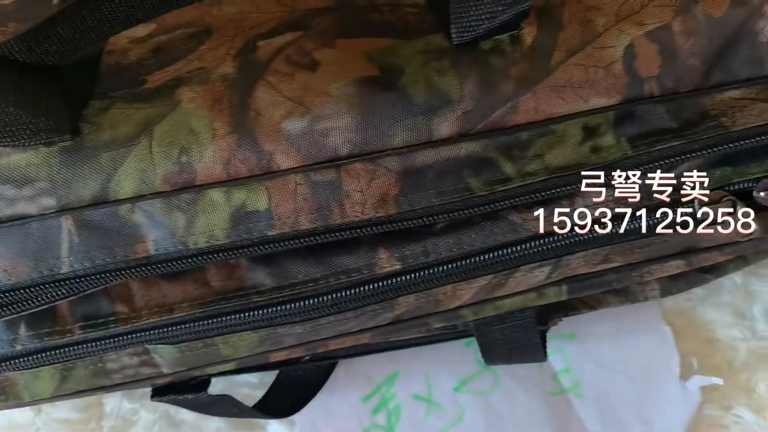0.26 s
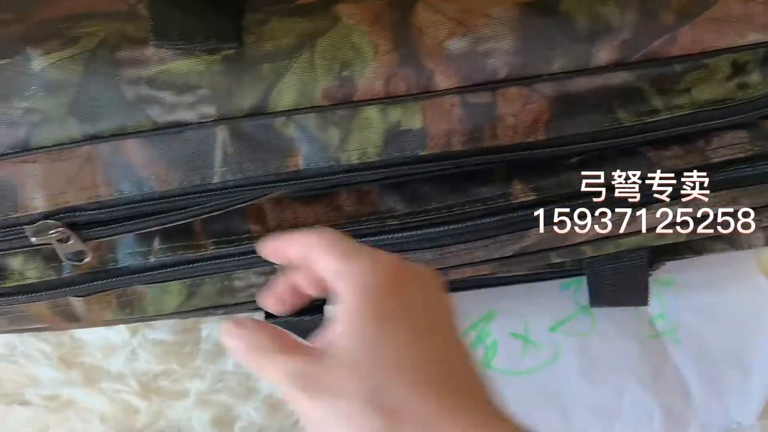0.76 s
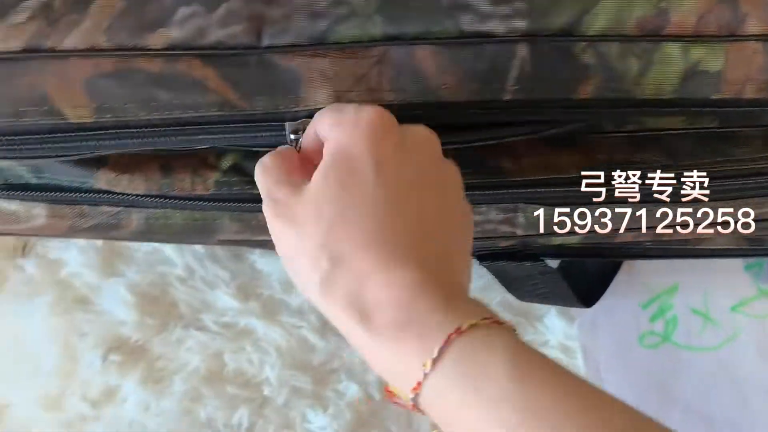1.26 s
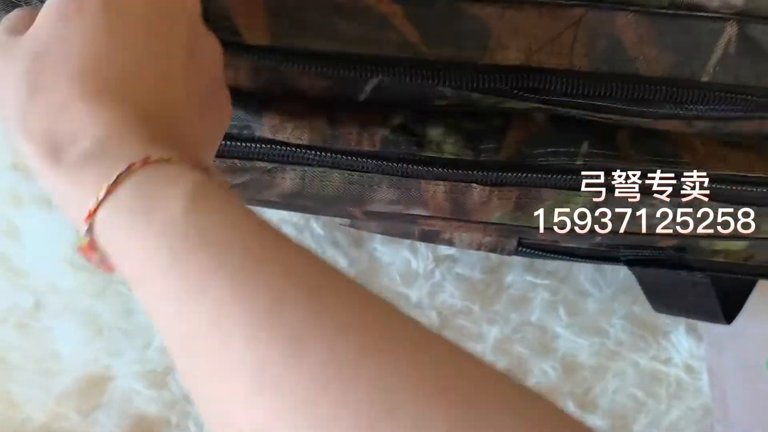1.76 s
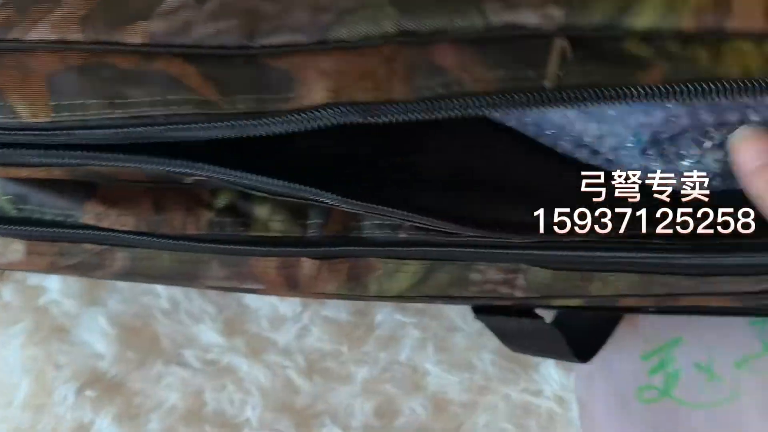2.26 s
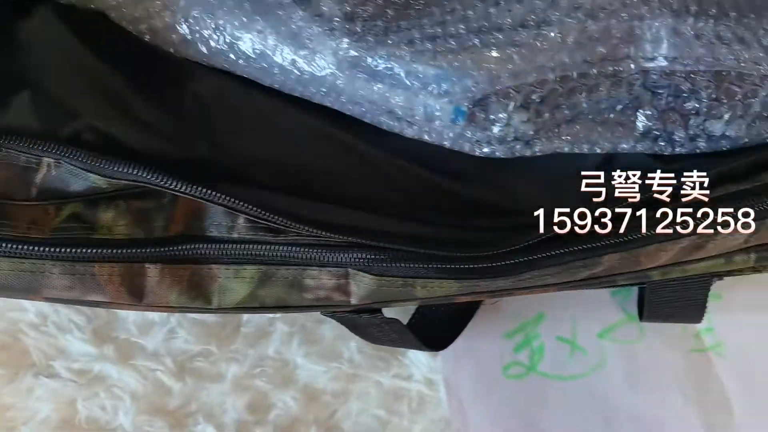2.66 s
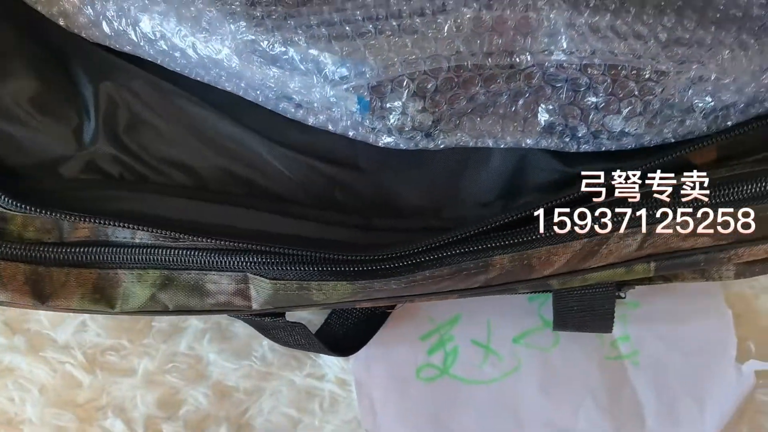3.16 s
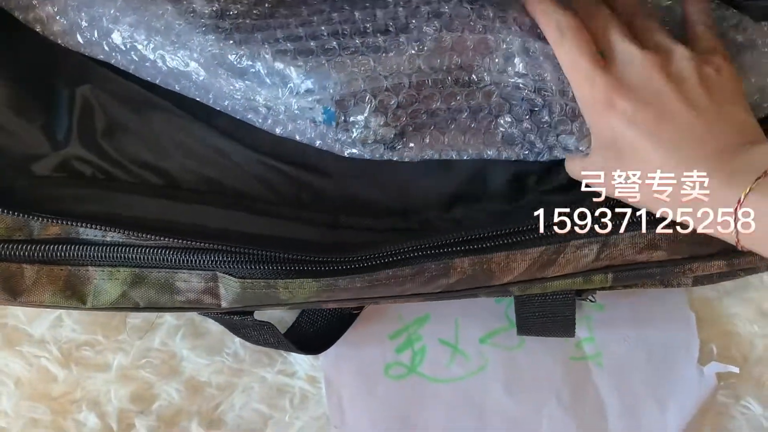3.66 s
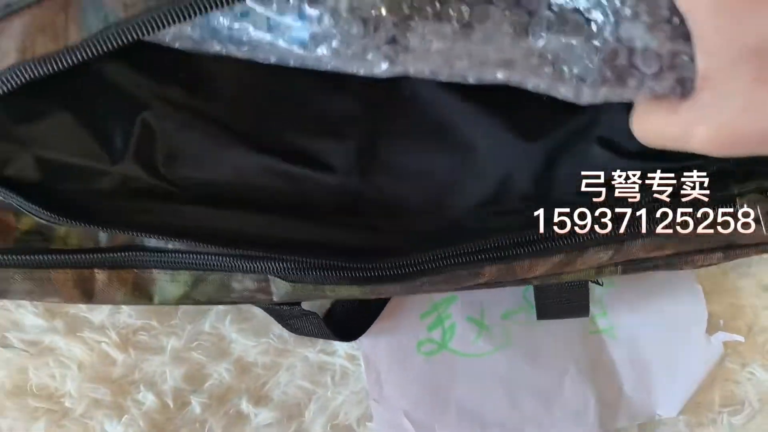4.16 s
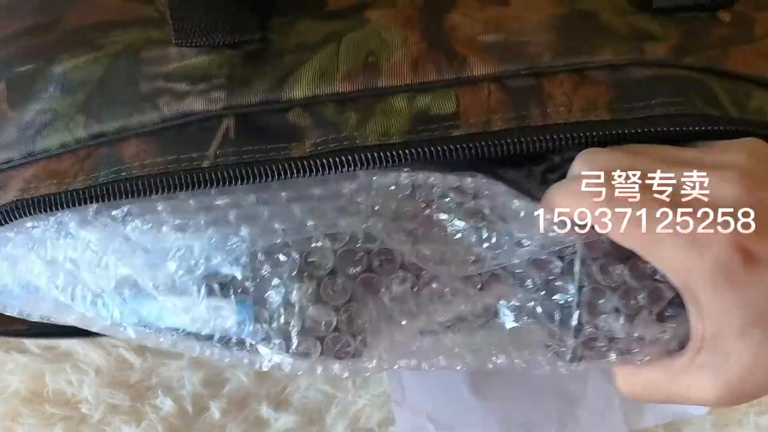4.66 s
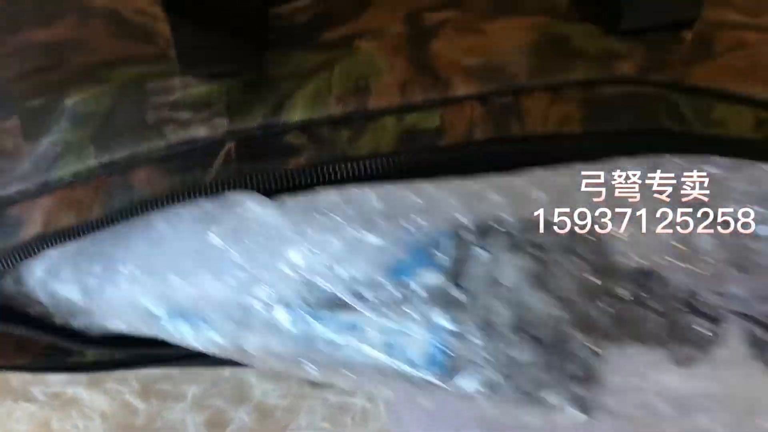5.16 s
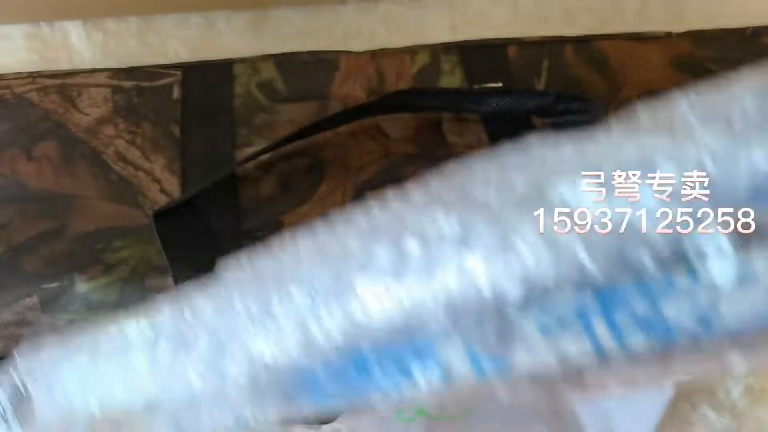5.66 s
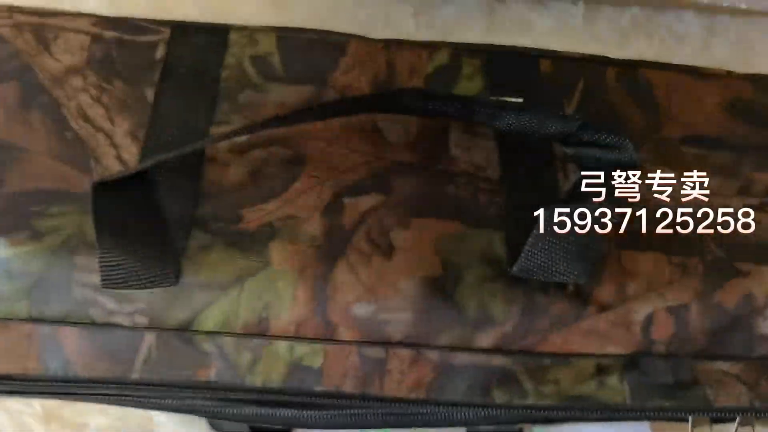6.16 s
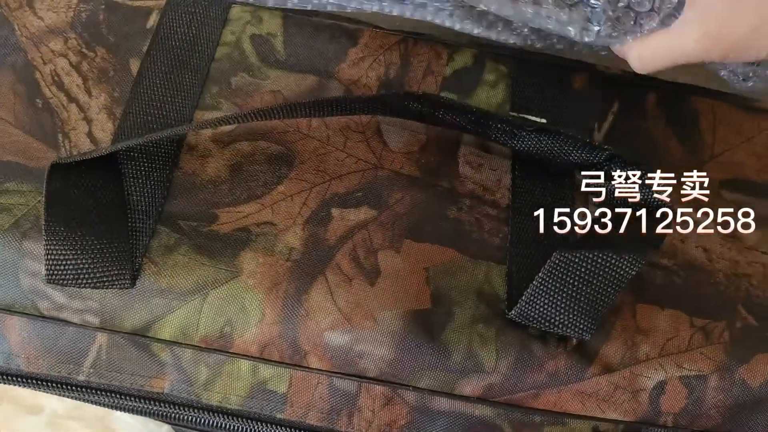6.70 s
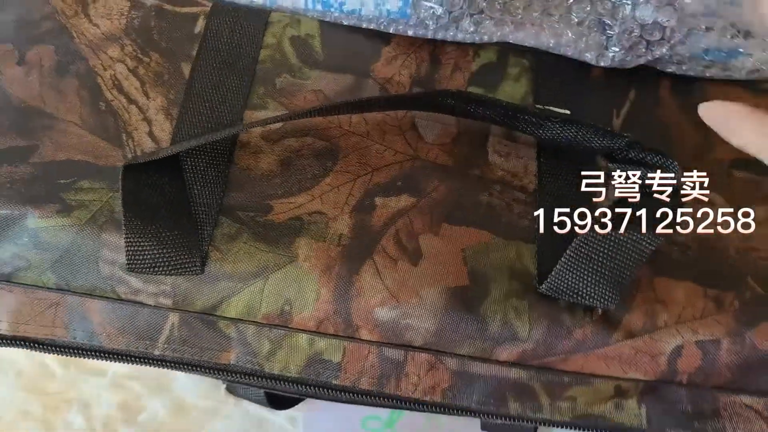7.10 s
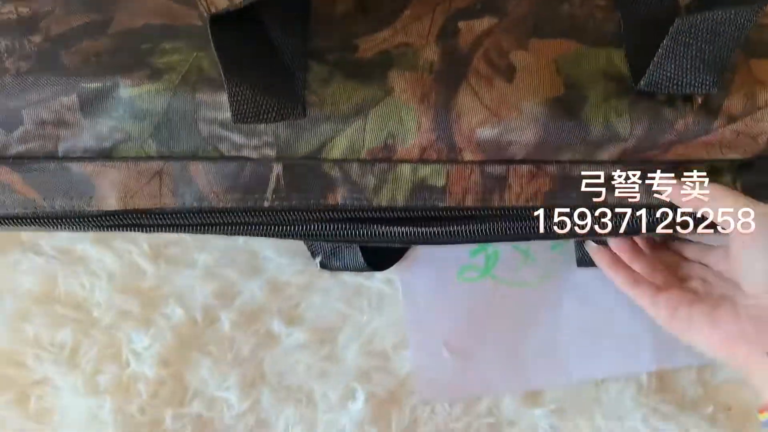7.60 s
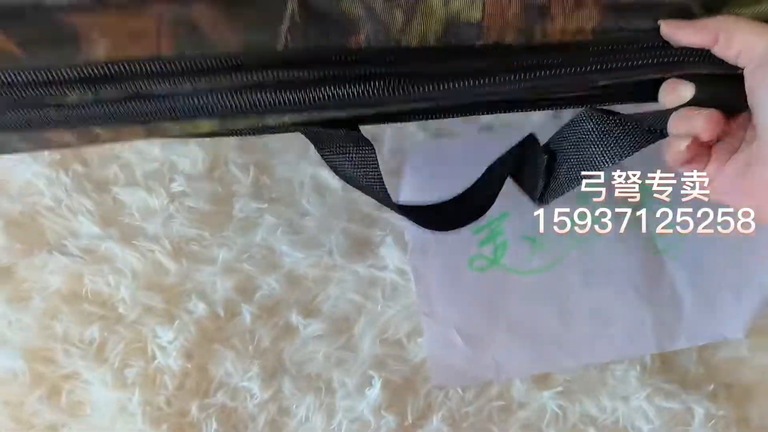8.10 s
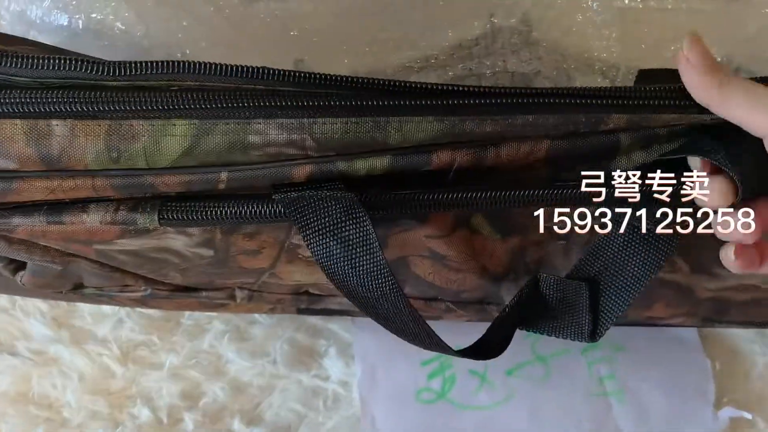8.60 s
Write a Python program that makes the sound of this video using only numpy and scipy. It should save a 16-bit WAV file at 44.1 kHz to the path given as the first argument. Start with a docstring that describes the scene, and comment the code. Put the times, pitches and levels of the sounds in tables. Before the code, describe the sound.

A padded fabric case is unzipped in three uneven pulls, a bubble-wrapped load crackles out, thumps down heavily, then the cloth lid flops open.

```python
"""In a small furnished room, a padded fabric case is unzipped close by in three uneven pulls of meshing teeth.
A heavy item in bubble wrap is dragged out, crinkling by stick-slip, and set down behind the case with two thumps.
Then a hand rubs along the cloth and throws the lid open, which lands with a soft low flop.
Friction is shaped noise and creases popping; knocks and landings are damped oscillations; a faint room tail follows."""
import sys
import numpy as np
from scipy import signal
from scipy.fft import rfft, irfft
from scipy.io import wavfile
from scipy.ndimage import uniform_filter1d, map_coordinates

SR = 44100
rng = np.random.default_rng(int(sys.argv[2]) if len(sys.argv) > 2 else 0)


def int16_out(signal):
    """Quantize to a 16-bit WAV file."""
    q = np.round(np.clip(np.atleast_2d(signal).T, -1, 1) * 32767)
    wavfile.write(sys.argv[1], SR, q.astype(np.int16))


N = 389844
TIME = np.arange(N) / SR  # s

# speed of the slider, one curve for each pull: t/s, tooth rate/(teeth per s)
ZIP_SPEED = [
    [(0, 386), (.03, 352), (.105, 313), (.135, 182), (.17, 210)],
    [(.195, 117), (.23, 143), (.27, 158), (.33, 94)],
    [(1.32, 65.7), (1.47, 110), (1.5, 156), (1.55, 170), (1.575, 212), (1.6, 226), (1.622, 280),
     (1.648, 300), (1.68, 284), (1.7, 246), (1.73, 195), (1.79, 190)],
]
# each pull at the usual speed: buzz of the cloth panel level/dB, rasp of the teeth level/dB,
# unevenness as a share of the speed (capped below), easing off at the end t/s
ZIP_PULLS = [(-40.5, -48.5, 0.21, 0.029), (-43, -46, 0.09, 0.033), (-35.5, -42.5, .04, 0.097)]
# response of the tugged cloth panel: f/Hz, level/dB
ZIP_PANEL_SPECTRUM = [(60, -38), (130, 5.5), (300, 19.5), (400, 14.5), (530, 18.5), (720, -1.5), (920, 12),
                      (1150, -25), (1650, 10), (2500, -48), (5000, -43)]
# spectrum of the teeth: f/Hz, level/dB per Hz
ZIP_TEETH_SPECTRUM = [(600, 0.5), (1200, 4.5), (2000, -1), (3200, -1), (4500, -9), (6500, -4.5), (7800, 0),
                      (9000, -4), (10500, -4.5), (12800, -15), (15000, -14), (16000, 1.5)]
USUAL_TEETH_PER_S = 200
BUZZ_DB_PER_DOUBLING, RASP_DB_PER_DOUBLING = 9.5, 15  # a faster pull is louder
STEADYING, MAX_UNEVENNESS = 1.6, .17  # unevenness falls with this power of the speed, and is capped
GRIP_S = 0.00046  # the slider starts at once
OPPOSITE_ROW, TOOTH_TICK_S = .3, .0009  # strength of the opposite row of teeth; decay time of one tick


def zipper(uneven_db=14):
    """Periodic excitation: each parting tooth tugs the panel and ticks; slow pulls are soft and uneven."""
    out, t = np.zeros((2, N)), TIME[:2 * SR]
    for speed, (buzz_db, rasp_db, unevenness, ease_s) in zip(ZIP_SPEED, ZIP_PULLS):
        times, teeth_per_s = np.transpose(speed)
        rate = np.interp(t, times, teeth_per_s)
        pace = rate / USUAL_TEETH_PER_S
        uneven = np.minimum(unevenness / pace ** STEADYING, MAX_UNEVENNESS)
        moving = ramp((t - times[0]) / GRIP_S) * ramp((times[-1] - t) / ease_s)

        # the whole part of the running phase counts the teeth
        phase = np.cumsum(rate * (1 + uneven * wander(120)[:len(t)])) / SR
        tooth = phase.astype(int)
        tooth_db = uneven_db * np.sqrt(abs(uneven)) / 2 * rng.standard_normal(len(t))[tooth]
        size = amp(tooth_db)
        tugs = np.diff(tooth, prepend=0) * size

        # ticks stand apart in a slow pull and merge in a fast one; the opposite row lets go half a step later
        tick_phase = TOOTH_TICK_S * rate
        near_row = np.exp(-(phase % 1) / tick_phase)
        far_row = OPPOSITE_ROW * np.exp(-((phase + .5) % 1) / tick_phase)
        gate = size * (near_row + far_row) + .1  # .1: the steady drag of the slider

        pull = (tugs - uniform_filter1d(tugs, size=600)) * np.sqrt(SR / rate) * np.array([[1], [.5]])
        rough = .04 + 4 * abs(uneven)  # a steady pull buzzes cleanly, a jerky one scrapes
        scraping = rough * evened(gate) * rng.standard_normal((2, len(t)))
        panel = colour(pull + scraping, ZIP_PANEL_SPECTRUM)
        teeth = colour(gate * rng.standard_normal((2, len(t))), ZIP_TEETH_SPECTRUM)

        # as the hand eases off, the rasp dies before the buzz
        buzz = moving * amp(buzz_db + BUZZ_DB_PER_DOUBLING * np.log2(pace))
        rasp = moving ** 2 * amp(rasp_db + RASP_DB_PER_DOUBLING * np.log2(pace))
        for part, gain in ((panel, buzz), (teeth, rasp)):
            local_power = abs(uniform_filter1d(part[0] ** 2, size=2400))
            out[:, :len(t)] += gain * part / np.sqrt(local_power + 1e-12)
    return out


# touches of the pull tab and the teeth: t/s, peak level/dB before the common gain,
# lowest f/Hz (a light touch rings only the high modes)
TICKS = [(0.186, -47, 5000), (0.232, -36, 5000), (0.264, -41.5, 4000), (0.297, -44.5, 3000),
         (1.055, -50, 2970), (1.077, -27.5, 604), (1.119, -41, 3000), (1.141, -48, 1000), (1.202, -45, 700),
         (1.318, -37.5, 600), (1.358, -42, 2000), (1.39, -36, 4000), (1.401, -37, 4000), (1.413, -40, 4000),
         (1.446, -35.5, 5000), (1.459, -43, 6000), (1.471, -28, 800), (1.479, -31, 3040),
         (1.526, -30.5, 4000), (1.847, -21.5, 500), (3.02, -42, 6000)]
# modes of pull tab and slider: f/Hz, width/Hz, level/dB
TAB_MODES = [(950, 155, 20), (3500, 340, -1), (5000, 400, 1), (7400, 400, 6), (8400, 350, 7)]


def ticks(ring_db=-4, gain_db=1):
    """Modal excitation by impact: metal meets metal in a dry crack with a heavily damped ring."""
    out, t = np.zeros((2, N)), TIME[:SR // 16]
    for s, db, low_hz in TICKS:
        crack = rng.standard_normal((2, len(t))) * np.exp(-t / .0011)
        ring = sum(amp(level) * resonate(crack, hz, hz / width) for hz, width, level in TAB_MODES)
        direct = .2 * band(crack, 9000, "low", order=4)
        sound = band(amp(ring_db) * ring + direct, low_hz, "high")
        add(out, s, amp(db + gain_db) * sound / abs(sound[0]).max())
    return out


# tugs and slides of the bubble wrap: start t/s, attack t/s, hold t/s, release t/s,
# rub level/dB before the common gain, crispness level/dB above the rub, rumple of the panel level/dB
WRAP_RUB = [(2.75, 0.14, 0.035, 0.088, -44.5, 2.5, -47), (3.53, 0.058, 0.063, 0.3, -47.5, 1, -52),
            (3.7, 0.046, 0.19, 0.12, -46, 4.5, -55), (3.92, 0.096, 0.15, 0.44, -42.5, -1, -41.5),
            (4.3, 0.071, 0.067, 0.26, -44.5, 1.5, -43), (4.48, 0.17, 0.59, 0.23, -53.5, 1, -56.5),
            (4.945, 0.037, 0.034, 0.075, -39.5, -1.5, -38.5), (5.05, 0.17, 0.051, 0.21, -55.5, 2, -57),
            (5.27, 0.069, 0.07, 0.065, -56.5, 1.5, -53), (5.44, 0.039, 0.037, 0.48, -72, 5, -67.5),
            (5.85, 0.22, 0.33, 0.23, -79, 2, -69), (6.255, 0.023, 0.015, 0.47, -61.5, 4, -60),
            (6.45, 0.12, 0.26, 0.32, -52, -0.5, -54), (6.67, 0.1, 0.015, 0.1, -48.5, 1, -64),
            (6.87, 0.028, 0.025, 0.22, -51.5, 1.5, -66), (7.12, 0.044, 0.028, 0.49, -95, -2, -70.5),
            (8.34, 0.06, 0.03, 0.067, -41.5, -2.5, -60)]
# spectrum of the film: f/Hz, level/dB per Hz
WRAP_SPECTRUM = [(240, -28.5), (400, 0.5), (690, 0), (900, 5.5), (1310, 2.5), (1960, 1), (3160, -4.5),
                 (4580, -9.5), (6500, -10), (8240, -7.5), (10500, -13), (15000, -17)]


def wrap(clump_db=1.15, drift_db=1.5, gain_db=1):
    """Stick-slip friction: film slides with a fine, dense crinkle; now and then a single crease pops out."""
    dull, crisp, _ = strokes(WRAP_RUB)
    sliding = grains(per_s=4000, spread_db=3, ring_s=.0005, smooth=.8, count=8)
    popping = .4 * crackle(per_s=300, spread_db=3.5, cycles=1.5)
    texture = drift(colour(sliding + popping, WRAP_SPECTRUM), drift_db)
    texture = texture * amp(clump_db * wander(45))
    return amp(gain_db) * rub(texture, dull, crisp)


# snaps of the plastic film and the stiff cloth: t/s, peak level/dB, f/Hz, decay t/s
SNAPS = [(2.758, -37, 1300, .003), (2.907, -25, 2500, .0014), (2.967, -29, 1900, .0016),
         (3.678, -21, 2400, .0007), (3.752, -25, 6000, .0012), (3.7934, -9, 6200, .001),
         (3.795, -14, 1760, .0009), (3.839, -22, 5500, .0006), (3.993, -21, 7100, .001),
         (4.094, -23, 8000, .0007), (4.129, -16, 3000, .0015), (4.226, -28, 2500, .0008),
         (4.264, -26, 1200, .0027), (4.274, -30, 900, .003), (4.571, -33, 3060, .0017),
         (4.614, -34, 5500, .0008), (4.658, -35, 3500, .001), (4.7446, -29, 3150, .0014),
         (4.857, -33, 1770, .002), (5.4, -33, 1400, .003), (4.9438, -10, 2030, .002),
         (4.9452, -12, 4000, .0012), (4.945, -20, 800, .002), (4.13, -25, 1000, .002),
         (5.42, -36.5, 5040, .011), (5.524, -46, 7000, .002), (5.584, -37, 5000, .004),
         (5.977, -41, 7170, .0017), (6.081, -50, 2440, .003), (6.806, -23, 1755, .0083),
         (6.807, -25, 8700, .015), (6.635, -16, 6360, .0016), (6.68, -23, 5000, .002),
         (6.931, -36, 7700, .0009), (6.977, -27.5, 1850, .0013), (7.031, -39, 2300, .0013),
         (7.58, -36, 870, .0024), (7.691, -35, 1700, .004), (7.756, -35, 1600, .004),
         (7.769, -35, 1400, .003), (7.803, -38, 1200, .003), (7.869, -39, 2500, .002),
         (7.898, -24, 880, .004), (7.968, -26, 1400, .0025), (7.998, -33, 900, .003),
         (8.007, -31, 900, .0035), (8.386, -23, 2280, .004)]


def snaps(q=1.54, broad=0.035, low_hz=550, top_hz=11000, side_db=-4):
    """Impulsive release of strain: short cracks, each with the resonance of the small patch that lets go."""
    out, t = np.zeros((2, N)), TIME[:SR // 12]
    for s, db, hz, decay_s in SNAPS:
        crack = rng.standard_normal((2, len(t))) * np.exp(-t / decay_s) * amp([[0], [side_db]])
        patch = resonate(crack, hz, q) + broad * crack
        sound = band(band(patch, low_hz, "high"), top_hz, "low")
        add(out, s, amp(db) * sound / abs(sound[0]).max())
    return out


# bubble wrap relaxing after it is let go: start t/s, length t/s, level/dB at the start
SETTLING = [(5.43, 0.59, -63.5), (6.992, 0.33, -69.5)]
SETTLE_DB_PER_S = 23


def settling(low_hz=3000):
    """Relaxation: left alone, the creased film ticks on finely, sparsely and ever more faintly."""
    gain = 0
    for s, length, db in SETTLING:
        gain = gain + amp(db - SETTLE_DB_PER_S * abs(TIME - s)) * (TIME > s) * (TIME < s + length)
    film = colour(crackle(per_s=120, spread_db=3.5, cycles=1), WRAP_SPECTRUM)
    return gain * evened(band(film, low_hz, "high", order=1))


# heavy landings: t/s, boom level/dB, boom f/Hz, boom t60/s, rattle of the load level/dB (before halving),
# crush of the padding level/dB, shudder level/dB, shudder decay t/s
THUMPS = [(6.2847, -20.5, 202.6, 0.13, -40, -46.5, -36, .025),
          (6.298, -24, 124, 0.047, -37.5, -51, -35.5, .02), (6.329, -28, 110, 0.1, -54, -69, -47, 0.018),
          (6.393, -34.5, 111, 0.17, -72, -82, -69, 0.026),
          (6.7948, -2.5, 193, 0.046, -39.5, -52, -16.5, 0.029),
          (6.805, -8, 119, 0.25, -17.5, -29.5, -24, 0.042),
          (6.8312, -13.5, 122.8, 0.32, -18, -40, -29, .045), (8.434, -12.5, 63, 0.24, -31.5, -60, -40, .04),
          (8.477, -25, 100.7, 0.36, -34, -60, -34.5, .04), (8.519, -31, 99, 0.2, -37.5, -64, -34, 0.016)]
# modes the load rattles with: f/Hz, level/dB, t60/s
LOAD_MODES = [(67.4, -7.5, 0.68), (87, 8.5, 0.16), (177.3, -1.5, 0.38), (213.3, 6, 0.14),
              (248.4, -2.5, 0.27), (283, 1.5, 0.086), (314, -2, 0.074), (343.3, -2.5, 0.35),
              (410, -4, 0.08), (513, -12.5, 0.18), (628, -8.5, 0.19), (847.6, -8.5, 0.18),
              (990, -9.5, 0.11), (1355, -9.5, 0.12), (1860, -14, 0.12)]
# loose cloth and stuffing shaken by a landing: f/Hz, level/dB per Hz
SHUDDER_SPECTRUM = [(50, -29), (110, -7), (200, 2.5), (330, 1.5), (450, -6.5), (600, -26), (1200, -37),
                    (3000, -58)]


def thumps(crush_s=0.038, crush_hz=1200, shudder_rise_s=0.0024):
    """Impact response: a landing booms, rattles the load, crushes the padding and makes loose cloth shudder."""
    out, t = np.zeros((2, N)), TIME[:SR]
    for s, db, hz, t60, rattle_db, crush_db, shudder_db, shudder_s in THUMPS:
        rattle = sum(rng.choice([-1, 1]) * amp(level) * boom(t, f, decay, rise_s=0.00076)
                     for f, level, decay in LOAD_MODES)
        crush = evened(band(band(rng.standard_normal((2, SR)), crush_hz, "low"), 200, "high"))
        crush = crush * np.exp(-t / crush_s)
        shudder = evened(colour(rng.standard_normal((2, SR)), SHUDDER_SPECTRUM))
        shudder = shudder * ramp(t / shudder_rise_s) * np.exp(-t / shudder_s)
        swing = amp(db) * boom(t, hz, t60, rise_s=0.0012) + amp(rattle_db) * rattle / 2
        # a surface radiates little far below its own pitch
        add(out[0], s, band(swing, .33 * hz, "high"))
        add(out, s, amp(crush_db) * crush + amp(shudder_db) * shudder)
    return out


# fingers and slider knocking on the case: t/s, peak level/dB, f/Hz
KNOCKS = [(0.108, -21.5, 307), (0.221, -36.5, 304), (.907, -34.5, 292), (0.93, -41, 312), (1.321, -36, 480),
          (1.842, -22.5, 534), (1.846, -26, 110), (1.979, -43, 410), (2.017, -40, 415), (2.039, -42, 284),
          (2.108, -38.5, 213), (2.389, -43.5, 227), (2.664, -38, 186), (2.721, -31, 209),
          (2.759, -31.5, 147), (2.828, -35, 225), (3.41, -45, 363), (3.467, -39, 182), (4.035, -32.5, 544),
          (4.063, -30.5, 293), (4.265, -27, 484), (4.385, -29, 220), (7.582, -38, 340), (7.691, -31, 300),
          (7.763, -30, 300), (7.785, -31, 295), (7.896, -28.5, 384), (7.955, -22.5, 344), (7.961, -28, 314),
          (7.997, -31, 350), (8.008, -29, 306), (8.274, -29, 225), (8.304, -33.5, 206)]


def knocks(t60=0.047, puff=0.19, puff_s=0.0072, puff_hz=900):
    """Heavily damped oscillation: a dead knock on padding gives a few swings and a dull puff."""
    out, t = np.zeros((2, N)), TIME[:SR // 6]
    for s, db, hz in KNOCKS:
        dull_noise = evened(band(rng.standard_normal((2, len(t))), puff_hz, "low", order=3))
        sound = puff * dull_noise * np.exp(-t / puff_s)
        sound[0] += boom(t, hz, t60, rise_s=0.00097)
        add(out, s, amp(db) * sound / abs(sound[0]).max())
    return out


# strokes of hand and lining on the cloth: start t/s, attack t/s, hold t/s, release t/s,
# rub level/dB, crispness level/dB above the rub, rumple of the panel level/dB
CLOTH_RUB = [(.08, 0.039, 0.15, 0.12, -56, -12, -53), (.42, 0.011, 0.089, 0.071, -70.5, -3, -63.5),
             (.58, 0.012, 0.008, 0.11, -68, -0.5, -57.5), (.72, 0.061, 0.16, .1, -86.5, -3, -80),
             (.915, 0.015, 0.028, 0.32, -60.5, -9.5, -63), (1.04, 0.015, 0.024, 0.12, -60.5, -2, -52.5),
             (1.195, 0.005, 0.083, 0.068, -64.5, -9, -57), (1.32, 0.039, 0.14, 0.49, -53, -6, -50.5),
             (1.71, .02, 0.028, .12, -51, -12.5, -40), (1.79, 0.046, 0.055, 0.33, -54, -14, -49),
             (2, 0.01, 0.073, 0.16, -70, 12.5, -49), (2.08, 0.069, 0.0061, 0.15, -55, -1.5, -51.5),
             (2.22, 0.052, 0.052, 0.73, -62.5, 4, -56), (2.52, 0.013, 0.029, 0.62, -65, 2, -68),
             (2.63, 0.078, 0.11, 0.22, -52, -9.5, -50), (2.9, 0.029, 0.068, 0.099, -58, -6, -50.5),
             (3.02, 0.067, 0.041, 0.25, -59.5, -4.5, -58), (3.2, 0.069, 0.03, 0.21, -66, -1.5, -65.5),
             (7.2, 0.14, 0.36, 0.12, -79, -2.5, -76), (7.574, 0.015, 0.06, 0.47, -44, -9, -47),
             (7.745, 0.0078, 0.025, 0.7, -49, -28, -45), (7.885, 0.042, 0.061, 0.21, -45.5, -5, -38),
             (8.02, 0.057, 0.073, 1, -53, -2, -49.5), (8.32, 0.048, 0.13, 0.054, -43.5, -3, -40.5),
             (8.58, 0.15, 0.28, 0.16, -66, -6.5, -70)]
# spectrum of the weave: f/Hz, level/dB per Hz
CLOTH_SPECTRUM = [(240, -30), (400, 11.5), (553, 3.5), (839, 8.5), (1230, 0.5), (1310, 1.5), (1760, 0),
                  (3120, -8), (3470, -10.5), (5110, -15), (7870, -12.5), (9320, -16.5), (14800, -25),
                  (16000, -26)]


def cloth(clump_db=2, drift_db=2):
    """Stick-slip friction: a coarse nylon weave catching and slipping."""
    dull, crisp, _ = strokes(CLOTH_RUB)
    sliding = grains(per_s=2200, spread_db=-3.5, ring_s=0.0011, smooth=1.0, count=6)
    catching = .8 * crackle(per_s=1500, spread_db=4, cycles=4)
    texture = drift(colour(sliding + catching, CLOTH_SPECTRUM), drift_db)
    texture = texture * amp(clump_db * wander(25.0))
    return rub(texture, dull, crisp)


# nails and film skating over the weave: t/s, length t/s, f/Hz, level/dB
SCRAPES = [(2.079, 0.028, 900, -48), (2.124, 0.054, 880, -44.5), (2.238, .045, 397, -57),
           (2.324, 0.058, 360, -52), (2.503, 0.089, 3460, -61), (3.043, 0.13, 2050, -63),
           (5.185, 0.18, 870, -53), (6.283, 0.023, 970, -46.5), (6.532, 0.2, 483, -52),
           (6.772, 0.035, 470, -41), (7.609, 0.053, 1300, -42), (7.679, 0.022, 1000, -45),
           (7.952, 0.033, 760, -48), (8.261, 0.042, 970, -45)]


def scrapes(q=5):
    """Resonant friction: a nail crossing the threads gives a short fuzzy chirp, here noise in a narrow band."""
    out = np.zeros((2, N))
    for s, length, hz, db in SCRAPES:
        noise = rng.standard_normal((2, SR // 4))
        chirp = evened(resonate(resonate(noise, hz, q), hz, q / 2))
        n = min(round(length * SR), SR // 4)
        add(out, s, amp(db) * chirp[:, :n] * signal.windows.tukey(n, .5))
    return out


# spectrum of the padded panels: f/Hz, level/dB per Hz
PANEL_SPECTRUM = [(25, 5), (60, -15.5), (110, 1.5), (170, 9), (260, 4.5), (330, 8.5), (420, -1),
                  (520, -2.5), (700, -23), (1000, -14.5), (2000, -68)]
# the whole case heaving as it is pushed or lifted: start t/s, length t/s, level/dB, f/Hz
HEAVES = [(.125, 0.18, -40.5, 114.8), (0.241, 0.097, -34, 109), (0.312, 0.14, -50, 100),
          (0.907, 0.097, -49, 117), (1.869, 0.45, -58.5, 99), (2.57, 0.34, -49.5, 116),
          (2.719, 0.45, -53.5, 125), (3.525, 0.12, -50, 111), (4.139, 0.21, -54.5, 59.4),
          (4.337, 0.24, -50, 76), (5.153, 0.18, -51, 46.4), (5.519, 0.41, -59.5, 91),
          (6.358, 0.066, -54, 106), (6.58, 0.2, -50, 101), (6.918, 0.26, -49, 87),
          (7.58, 0.29, -52.5, 90.5), (8, 0.25, -50, 103), (8.497, 0.19, -46, 105)]
HEAVE_RISE_S, HEAVE_FALL_S = 0.034, 0.064
SWAY_DB = -16  # sway of the panel that goes with a stroke, against its rumple


def flex(clump_db=4.5, heave_q=1.09):
    """Buckling: folds in the panels rumple low and lumpy under every stroke; the shifted case sways."""
    rumple = np.hypot(strokes(CLOTH_RUB)[2], strokes(WRAP_RUB)[2])
    folds = grains(per_s=410, spread_db=1.5, ring_s=0.0016, smooth=0.64, count=5)
    texture = colour(folds, PANEL_SPECTRUM) * amp(clump_db * wander(29))
    out = rub(texture, amp(SWAY_DB) * rumple, rumple, split_hz=200)
    t = TIME[:SR]
    for s, length, db, hz in HEAVES:
        sway = evened(resonate(resonate(rng.standard_normal(SR), hz, heave_q), hz, heave_q))
        swell = ramp(t / HEAVE_RISE_S) * ramp((length - t) / HEAVE_FALL_S)
        add(out[0], s, amp(db) * sway * swell)
    return out


# spectrum of the room's rumble: f/Hz, level/dB per Hz
AIR_SPECTRUM = [(12, -35.5), (20, -2.5), (120, 9), (172, -9.5), (367, -25.5), (434, -43.5), (513, -15),
                (642, -32.5), (849, -29), (1330, -33.5), (3530, -35.5), (6010, -54.5), (7950, -53),
                (14700, -74), (16000, -52)]


def air(level_db=-58.5):
    """Stationary background noise: the low steady rumble of the room."""
    return amp(level_db) * evened(colour(rng.standard_normal((2, N)), AIR_SPECTRUM))


# reverberation time of the room: f/Hz, t60/s
ROOM_T60 = [(60, 0.39), (250, 0.46), (1000, 0.13), (4000, 0.21), (14000, 0.19)]


def room(x, wet_db):
    """Reverberation: a faint diffuse tail, each band dying at its own speed."""
    noise = rng.standard_normal((2, SR // 2)) * (TIME[:SR // 2] > .004)  # the tail starts after 4 ms
    hz, t, z = signal.stft(noise, SR, nperseg=256)
    decay = amp(-60 * t / read(ROOM_T60, hz)[:, None])
    tail = signal.istft(z * decay, SR, nperseg=256)[1]
    return x + amp(wet_db) * signal.fftconvolve(x[:1], tail / np.linalg.norm(tail[0]), axes=1)[:, :N]


# where the slider is, first to the right, then to the left: t/s, lead of the left microphone/ms
SLIDER_PLACE = [(0, -0.22), (.1, -0.33), (.5, -0.26), (1.07, 0.23), (1.35, 0.13), (1.47, 0.15),
                (1.58, 0.23), (1.68, 0.22), (1.85, 0.33), (3, 0.071)]
# where hand and wrap rub on the case: t/s, lead of the left microphone/ms
RUB_PLACE = [(.55, -0.37), (.9, 0.15), (1.5, 0.19), (2, 0.29), (2.3, -0.075), (2.9, 0.047), (3.55, -0.042),
             (4.1, -0.064), (4.45, 0.26), (5.1, 0.21), (5.35, 0.24), (5.5, -0.44), (6, -0.253), (6.3, 0.24),
             (6.5, -0.26), (6.648, -0.071), (7.7, -0.075), (8.8, -0.048)]
# what the case scatters of the slider: f/Hz, level/dB against the direct sound
SLIDER_SCATTER = [(300, -18), (1000, -12), (2000, -15), (3500, -4), (5000, -8), (6700, -11), (9000, -1),
                  (15000, -1)]
# a broad rubbing patch is more diffuse: f/Hz, level/dB against the direct sound
RUB_SCATTER = [(150, -14.5), (500, -12), (1000, -5), (3000, -3), (8000, -0.5), (15000, -6.5)]
NEAR_SIDE_DB_PER_MS = 4  # level difference between the microphones per ms of lead


def placed(x, place, scatter):
    """Time and level differences: the microphone nearer the source hears it earlier and louder."""
    lead_ms = np.interp(TIME, *np.transpose(place))
    lead = lead_ms * SR / 1000  # samples
    scattered = colour(x[1], scatter)[0]
    channels = []
    for ear in (1, -1):  # left, right
        heard = map_coordinates(x[0] + ear * scattered, [np.arange(N) + ear * lead / 2], order=3)
        channels.append(amp(ear * NEAR_SIDE_DB_PER_MS * lead_ms / 2) * heard)
    return np.array(channels)


def rub(texture, dull_gain, crisp_gain, split_hz=3500):
    """Contact spectrum: light contact gives the dull part of a texture; hard creasing brings out the crisp."""
    dull = evened(band(texture, split_hz, "low", order=3))
    crisp = evened(band(texture, split_hz, "high", order=3))
    return dull * dull_gain + crisp * crisp_gain


def strokes(table):
    """Envelopes of rub, crispness and rumple: swell, hold, and exponential fall to a tenth in the release."""
    t, power = TIME[::32], 0
    for start, attack, hold, release, rub_db, crisp_db, rumple_db in table:
        fall = 10 ** (-np.maximum(t - start - attack - hold, 0) / release)
        shape = ramp((t - start) / attack) * fall
        levels = amp([[rub_db], [rub_db + crisp_db], [rumple_db]])
        power = power + (levels * shape) ** 2  # overlapping strokes add in power
    return np.array([np.interp(TIME, t, np.sqrt(p)) for p in power])


def grains(per_s, spread_db, ring_s, smooth, count=16):
    """Stick-slip: tiny snaps from many creases over a smooth friction hiss, as mid and side."""
    happens = rng.random(N) < per_s / SR
    size = amp(spread_db * np.minimum(rng.exponential(1, N), 4)) * happens
    crease = rng.integers(0, count, N)
    shapes = rng.standard_normal((count, 2, 400)) * np.exp(-TIME[:400] / ring_s)
    snapping = sum(signal.oaconvolve((size * (crease == k))[None], shapes[k], axes=1)[:, :N]
                   for k in range(count))
    return evened(snapping) + smooth * rng.standard_normal((2, N))


def crackle(per_s, spread_db, cycles):
    """Damped oscillation: single creases popping, each with its own pitch and few swings, as mid and side."""
    at, pitch, size, side = rng.random((max(int(per_s * N / SR), 1), 4)).T[:, :, None]
    hz = 900 * 15 ** pitch  # 900 to 13500 Hz
    turns = hz * TIME[:160]
    # small creases pop briefly but hard, which keeps the spectrum level
    strength = hz * amp(spread_db * np.minimum(-np.log(1 - size), 4))
    fade = strength * np.exp(-turns / cycles)
    index = ((at * (N - turns.shape[1])).astype(int) + np.arange(turns.shape[1])).ravel()
    channels = [np.bincount(index, (fade * np.sin(2 * np.pi * (turns + lag))).ravel(), N)
                for lag in (0, side)]
    return evened(np.array(channels))


def drift(x, depth_db, frames_size=12, bins_size=10):
    """Spectral modulation: a random field makes patches of the rustle's spectrum swell and fade."""
    z = signal.stft(x, SR, nperseg=512)[2]
    field = rng.standard_normal(z.shape[1:])
    for _ in range(2):
        field = uniform_filter1d(uniform_filter1d(field, bins_size, axis=0), frames_size, axis=1)
    return signal.istft(z * amp(depth_db * evened(field)), SR, nperseg=512)[1][:, :N]


def boom(t, hz, t60, rise_s):
    """Damped oscillator: a cushioned surface swings and dies away."""
    return np.sin(2 * np.pi * hz * t) * amp(-60 * t / t60) * (1 - np.exp(-t / rise_s))


def wander(rate_hz):
    """Low-pass random process: slow chance of rms 1."""
    spectrum = rfft(rng.standard_normal(N)) / (1 + (np.fft.rfftfreq(N, 1 / SR) / rate_hz) ** 4)
    return evened(irfft(spectrum, N))


def colour(x, spectrum):
    """Minimum-phase filtering: a causal filter with the given spectrum."""
    level_db = np.maximum(read(spectrum, abs(np.fft.fftfreq(4096, 1 / SR))), -100)
    log_gain = np.log(amp(level_db))
    taps = np.fft.ifft(np.exp(np.conj(signal.hilbert(log_gain)))).real[:2048]
    return signal.oaconvolve(np.atleast_2d(x), taps[None], axes=1)[:, :x.shape[-1]]


def band(x, hz, kind, order=2):
    """Band limiting: Butterworth low-pass or high-pass."""
    return signal.sosfilt(signal.butter(order, min(hz, SR / 2 - 1), kind, fs=SR, output="sos"), x)


def resonate(x, hz, q):
    """Resonance: a single mode of peak gain 1."""
    return signal.lfilter(*signal.iirpeak(min(hz, SR / 3), max(q, 1), fs=SR), x)


def ramp(x):
    """Raised-cosine envelope: a smooth step from 0 to 1."""
    return np.sin(np.pi / 2 * np.clip(x, 0, 1)) ** 2


def amp(db):
    """Level to amplitude: decibels to gain."""
    return 10 ** (np.asarray(db) / 20)


def evened(x):
    """Power normalisation: scales to rms 1."""
    return x / np.sqrt(np.mean(x ** 2) + 1e-20)


def read(points, hz):
    """Logarithmic frequency: interpolates a table on a log axis."""
    f, value = np.transpose(points)
    return np.interp(np.log(hz + 1), np.log(f + 1), value)


def add(mix, s, sound):
    """Superposition: mixes a sound in, in place, at time s."""
    part = mix[..., max(round(s * SR), 0):][..., :sound.shape[-1]]
    part += sound[..., :part.shape[-1]]


# stereo width of thuds and air: f/Hz, side level/dB against mid
WIDTH = [(30, -24.5), (150, -11.5), (280, -16.5), (500, -7.5), (1000, -1), (3000, 2)]


def scene(bass_lean=0.1):
    """Superposition: slider and rubbing patch move with the hand; the bass leans a little to the right."""
    # thuds are heard nearly dry, with only a very faint tail
    mid, side = room(flex() + knocks() + thumps(), wet_db=-22) + air()
    side = colour(side, WIDTH)[0] - bass_lean * band(mid, 600, "low", order=1)
    friction = cloth() + wrap() + settling() + snaps() + scrapes()
    rubbing = placed(room(friction, wet_db=-14.5), RUB_PLACE, RUB_SCATTER)
    # the slider is close to the microphones
    slider = placed(room(zipper() + ticks(), wet_db=-18), SLIDER_PLACE, SLIDER_SCATTER)
    return np.array([mid + side, mid - side]) + rubbing + slider


def record(dry, edge_hz=15750):
    """Band limiting: the recorder passes only what lies below its upper edge."""
    taps = signal.firwin(401, edge_hz, window=("kaiser", 9), fs=SR)
    return signal.oaconvolve(dry, taps[None], "same", axes=1)


dry = scene()
out = record(dry)
int16_out(out)
```